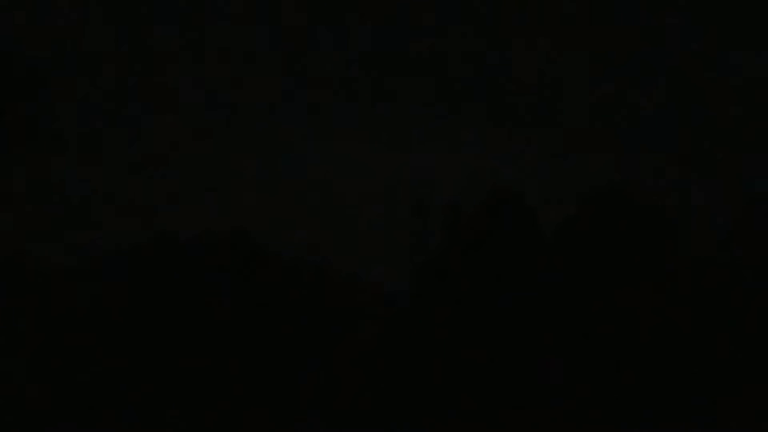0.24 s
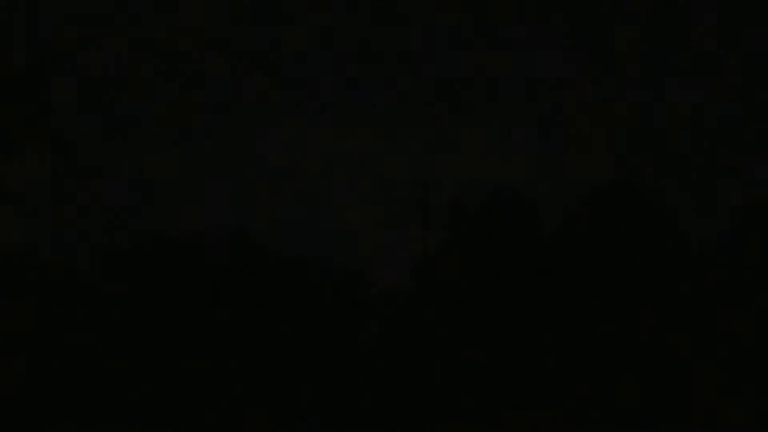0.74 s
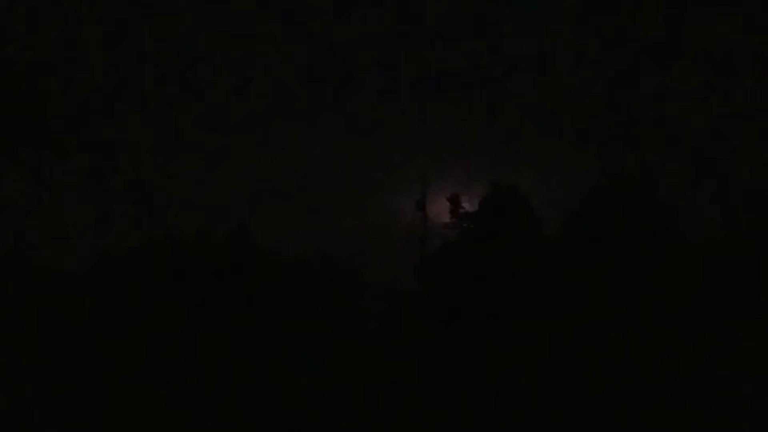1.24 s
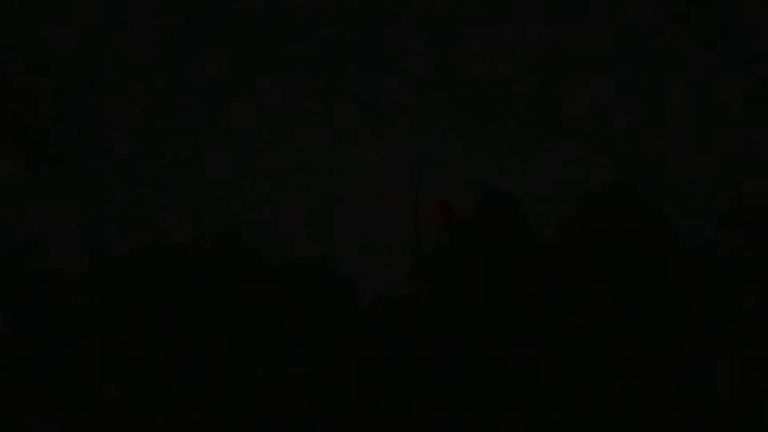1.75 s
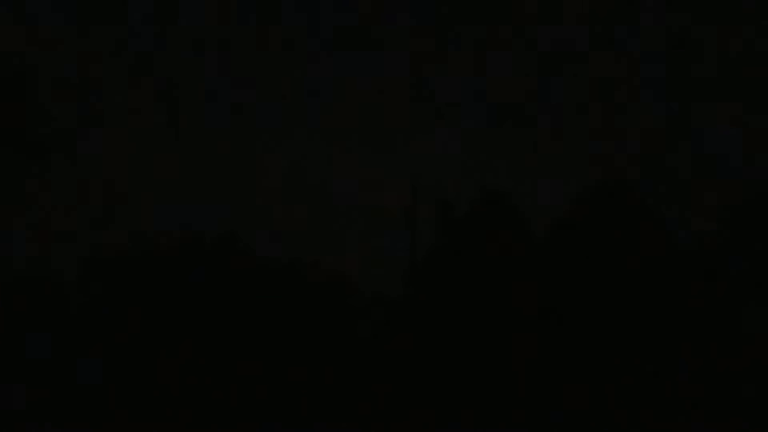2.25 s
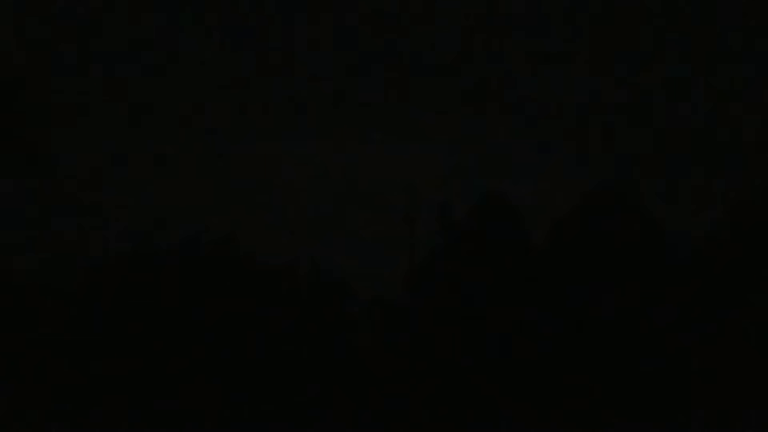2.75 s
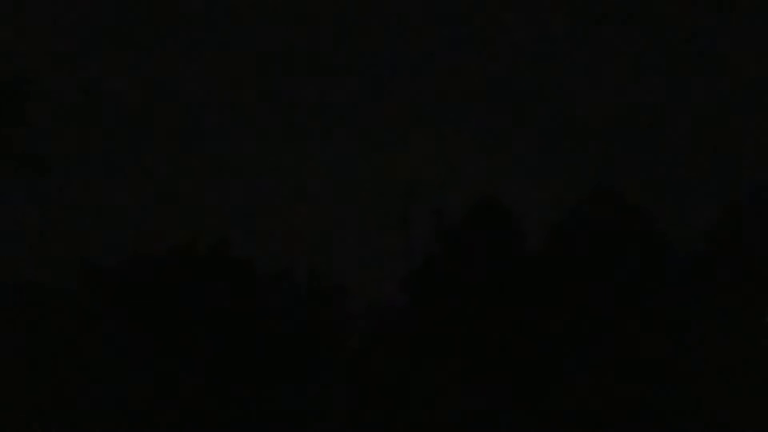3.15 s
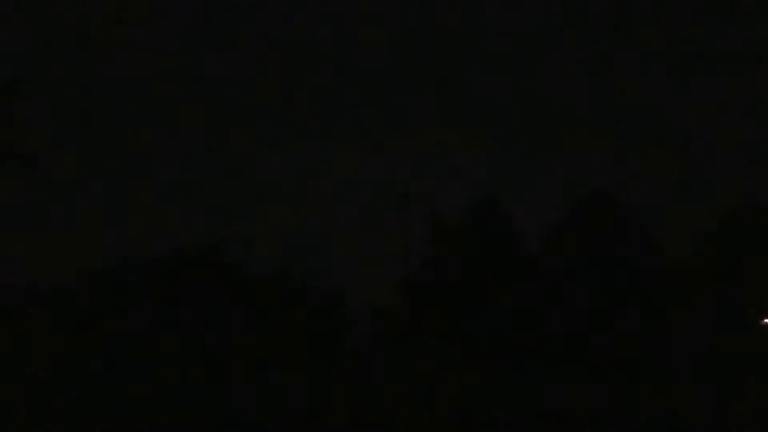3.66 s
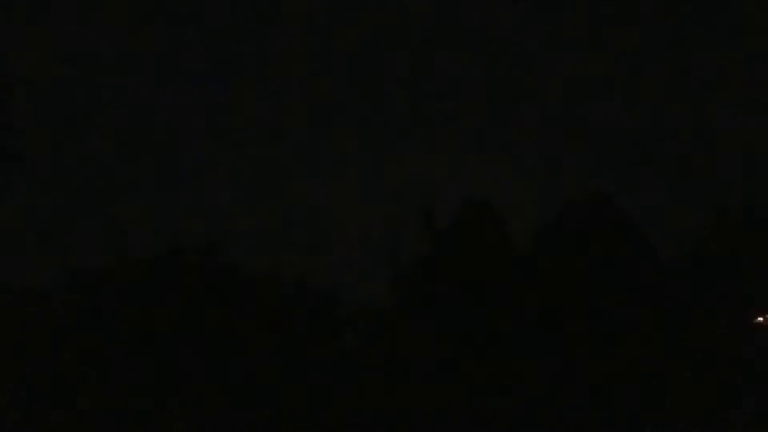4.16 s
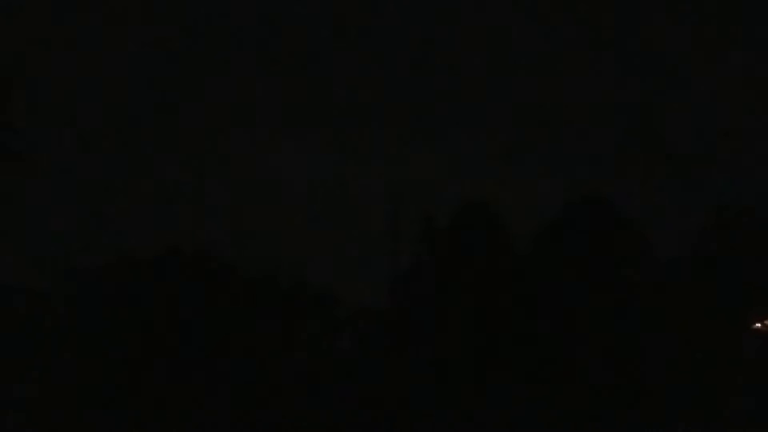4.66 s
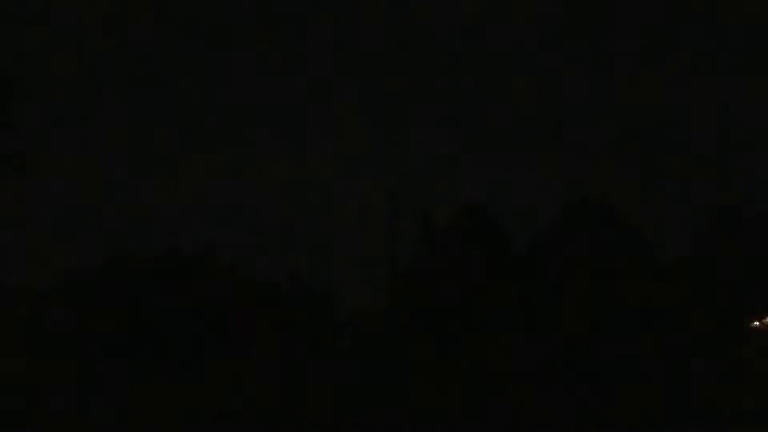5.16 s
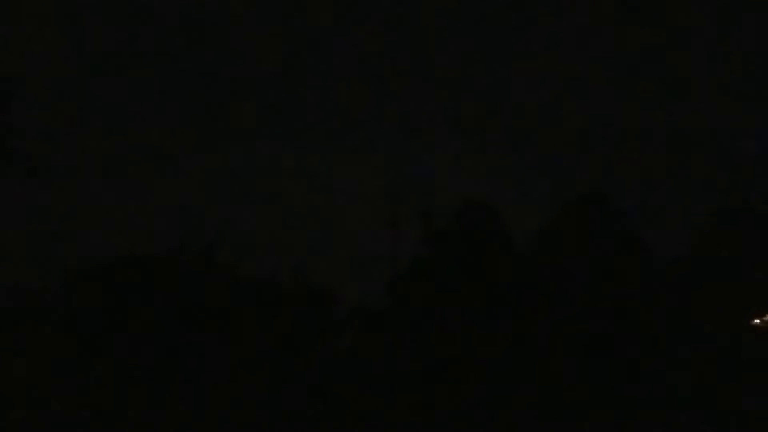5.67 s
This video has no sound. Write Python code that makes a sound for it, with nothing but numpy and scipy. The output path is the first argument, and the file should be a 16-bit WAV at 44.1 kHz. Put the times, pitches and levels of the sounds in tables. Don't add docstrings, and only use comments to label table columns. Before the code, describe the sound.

Outdoors at night by dark trees, many katydids scrape together in harsh, noisy pulses about twice a second over a steady fainter chorus. Three crickets on the left chirp in quick high trains. Distant machinery hums low throughout. Near the end one sharp dry snap clicks close to the left. Wide stereo pickup, with the insects leaning left.

```python
import sys
import numpy as np
from scipy import signal
from scipy.fft import rfft, irfft, next_fast_len
from scipy.io import wavfile
from scipy.ndimage import uniform_filter1d, map_coordinates

SR = 44100
rng = np.random.default_rng(int(sys.argv[2]) if len(sys.argv) > 2 else 0)


def generate_wav(sig):
    pcm = np.round(np.clip(np.atleast_2d(sig).T, -1, 1) * 32767).astype(np.int16)
    wavfile.write(sys.argv[1], SR, pcm)


def makeup_ratio(level_db):
    decades = np.asarray(level_db, float) / 20
    return 10 ** decades


N = 261513
LAG_S = .00039


def unit(x):
    return x / np.sqrt(np.mean(x ** 2) + 1e-20)


def along(points, hz):
    f, *cols = np.transpose(points)
    return np.array([np.interp(np.log(hz + 1), np.log(f + 1), c) for c in cols])


def curves(rows):
    s, *cols = np.transpose(rows)
    return [np.interp(np.arange(N) / SR, s, c) for c in cols]


def wobble(rate, channels=1):
    knots = rng.standard_normal((channels, 400))
    return np.array([map_coordinates(k, [np.arange(N) * rate / SR]) for k in knots])


def filtered(x, response):
    m = next_fast_len(N + SR // 2)
    return irfft(rfft(x, m) * response(np.fft.rfftfreq(m, 1 / SR)), m)[..., :N]


def closed(points, hz):
    return makeup_ratio(along(points, hz)) * ((hz > points[0][0]) & (hz < points[-1][0]))


# (frequency [Hz], left level [dB], right level [dB])
RUMBLE_COLOUR = [(15, -112.0, -110.7), (35, -88.5, -84), (58.4, -82, -81.5), (87, -76, -74),
                 (110, -76.5, -74.5), (151.4, -78.5, -76.5), (185, -89, -87), (245, -84.5, -83),
                 (310, -89, -87.5), (410, -89.5, -89), (598, -95.5, -94.5), (895, -96, -96.5),
                 (1320, -97.5, -95.5), (1610, -122.3, -122.4)]
# (frequency [Hz], likeness [0-1])
RUMBLE_ALIKE = [(30, .93), (80, .98), (150, .96), (300, .84), (550, .4), (900, .55), (1400, .5)]


def rumble():
    turn = lambda hz: np.arccos(np.clip(along(RUMBLE_ALIKE, hz)[0], 0, 1)) / 2
    mid_side = lambda hz: np.array([np.cos(turn(hz)), np.sin(turn(hz))])
    mid, side = filtered(rng.standard_normal((2, N)), mid_side)
    return unit(filtered(np.array([mid + side, mid - side]), lambda hz: closed(RUMBLE_COLOUR, hz)))


# (frequency [Hz], level [dB])
MOTOR_TONES = [(59, -71), (81, -66), (118.4, -66.5), (238, -77)]


def motors():
    t = np.arange(N) / SR
    tones = 0
    for hz, db in MOTOR_TONES:
        level = makeup_ratio(db + 4.6 * wobble(2.41))
        tones = tones + level * np.sin(2 * np.pi * hz * t + 1.27 * wobble(3.1))
    return tones * makeup_ratio([[-1.1], [.9]])


# (time [s], level [dB])
RUMBLE_LEVEL = [
    (0.0, -54),
    (1.27, -54.5),
    (2.43, -55.5),
    (2.73, -55),
    (4.24, -55.5),
    (4.59, -55.5),
    (5.05, -56),
    (5.38, -55),
    (5.93, -56),
]


def hum():
    level = makeup_ratio(curves(RUMBLE_LEVEL)[0] + 0.5 + 0.92 * wobble(7))
    both = level * rumble() + motors()
    return filtered(both, lambda hz: np.exp(-2j * np.pi * hz * np.array([[0], [LAG_S]])))


def strikes(spread_db, alike):
    sizes = makeup_ratio(spread_db * rng.standard_normal((3, N)))
    common, left, right = rng.standard_normal((3, N)) * sizes
    shared = np.array([common, np.roll(common, round(LAG_S * SR))])
    return unit(np.sqrt(alike) * shared + np.sqrt(1 - alike) * np.array([left, right]))


# (frequency [Hz], left level [dB], right level [dB])
BODY_COLOUR = [(920, -111.7, -116.0), (1399, -92, -96), (1820, -82, -88), (2135, -71.5, -75.5),
               (2430, -75, -86.5), (2610, -78.5, -84), (2706, -76, -76.5), (2953, -76.5, -75),
               (2993, -72, -87), (3330, -76.5, -77), (3685, -77, -83.5), (3680, -74, -81),
               (3760, -78, -89.5), (4600, -105.4, -107.9)]
WING_COLOUR = [(3350, -105.3, -107.5), (4200, -93.5, -77), (4300, -76, -88.5), (4790, -78.5, -77),
               (5280, -77.5, -81), (5440, -83.5, -81), (5740, -84, -85.5), (6280, -84, -102),
               (6830, -92.5, -90.5), (6730, -95, -102.3), (7400, -95, -106.0), (8580, -105.8, -108.0),
               (9720, -111.1, -109.8), (10900, -136.1, -134.8)]
RASP_COLOUR = [(9100, -132.7, -132.0), (10020, -107.7, -107.0), (10670, -101.1, -101.1), (11940, -90, -94),
               (12700, -95, -88.5), (13200, -85, -95), (13800, -85.5, -95), (15750, -82, -83.5),
               (15340, -83, -88), (16700, -110.9, -115.3)]
# (frequency [Hz], level [dB])
DISTANCE = [(1500, 3), (2100, -3), (2780, 2), (3100, -7), (3500, 1), (4300, -7), (5200, -4), (6000, -15),
            (6600, 3), (7500, -3.5), (9700, 4), (10500, -5.5), (12000, -11.5), (15600, -39)]


def far_chorus():
    zones = (BODY_COLOUR, WING_COLOUR, RASP_COLOUR)
    whole = lambda hz: np.sqrt(sum(closed(colour, hz) ** 2 for colour in zones))
    far = filtered(strikes(spread_db=1.0, alike=.25), lambda hz: whole(hz) * makeup_ratio(along(DISTANCE, hz)))
    return makeup_ratio(-48) * unit(far)


def cricket(chirps, count, rate_hz, top_hz, fall_hz, duty, gain_db, right_db, lag_ms):
    voice = np.zeros(N + 2 * SR)
    closure = duty * SR / rate_hz
    u = np.arange(int(closure)) / closure
    chance = rng.standard_normal((len(chirps), count, 3))
    for (s, db), row in zip(chirps, chance):
        for k, (size, tune, phase) in enumerate(row):
            hz = top_hz - fall_hz * u * u + 40 * tune
            level = makeup_ratio(db + gain_db + 0.78 * size - 3.2 * np.exp(-1.5 * k))
            start = SR + round((s + (k + .5 - duty / 2) / rate_hz) * SR)
            tone = np.sin(2 * np.pi * np.cumsum(hz) / SR + 7 * phase)
            voice[start:start + len(u)] += level * np.sqrt(np.sin(np.pi * u)) * tone
    late = SR - round(lag_ms * SR / 1000)
    return np.array([voice[SR:SR + N], makeup_ratio(right_db) * voice[late:late + N]])


# (first chirp [s], gap [s], level [dB])
HIGH_RUNS = [
    (.045, .1727, -65.7),
    (.752, .1802, -66),
    (2.57, .19, -67),
    (3.322, .182, -65.5),
    (4.575, .157, -64.7),
    (5.068, .1765, -65.4),
]
RUN_CHIRPS = (4, 10, 4, 7, 3, 5)
# (time [s], level [dB])
MID_CHIRPS = [(-0.016, -61), (0.219, -67), (0.443, -63), (0.701, -62), (0.971, -65), (1.241, -63),
              (1.49, -65), (1.76, -63), (2.0, -62), (2.226, -62), (2.457, -63), (2.718, -65), (2.963, -64),
              (3.201, -62), (3.469, -63), (3.703, -71), (3.951, -63), (4.201, -64), (4.442, -65),
              (4.709, -69), (4.982, -66), (5.241, -68), (5.49, -62), (5.73, -66)]
LOW_CHIRPS = [(-0.012, -68), (0.253, -68), (0.563, -67.0), (0.827, -69), (1.122, -65.4), (1.388, -64.3),
              (1.676, -67.2), (1.964, -67), (2.256, -65), (2.546, -67), (2.838, -66.5), (3.143, -66),
              (3.42, -65), (3.706, -70), (3.967, -65), (4.257, -66), (4.533, -70), (4.839, -68),
              (5.117, -66.5), (5.413, -68), (5.667, -67)]


def crickets():
    high = [(s + k * gap, db) for (s, gap, db), count in zip(HIGH_RUNS, RUN_CHIRPS) for k in range(count)]
    direct = cricket(high, count=6, rate_hz=107, top_hz=9145, fall_hz=870, duty=.92,
                     gain_db=6.5, right_db=-31, lag_ms=.3)
    direct = direct + cricket(MID_CHIRPS, count=10, rate_hz=86.1, top_hz=8580, fall_hz=500, duty=.6,
                              gain_db=4, right_db=-12, lag_ms=.4)
    direct = direct + cricket(LOW_CHIRPS, count=8, rate_hz=57, top_hz=6934, fall_hz=70, duty=.9,
                              gain_db=7.5, right_db=-16, lag_ms=.3)
    t = np.arange(SR // 8) / SR
    leaves = rng.standard_normal((2, len(t))) * makeup_ratio(-60 * t / .05)
    leaves = leaves / np.linalg.norm(leaves[0])
    return direct + makeup_ratio(-11) * signal.fftconvolve(direct, leaves, axes=1)[:, :N]


# (time [s], peak level [dB], frequency [Hz])
SNAP = [
    (5.32, -28, 3000),
]


def snap():
    out, t = np.zeros((2, N)), np.arange(44) / SR
    for s, db, hz in SNAP:
        pulse = -np.hanning(len(t)) * np.cos(2 * np.pi * hz * (t - t.mean()))
        out[:, round(s * SR):][:, :len(t)] += makeup_ratio([[db], [db - 20]]) * pulse
    return out


def phrases(rows, attack_s, release_s, growth_db):
    t = np.arange(0, N, 32) / SR
    gate = lambda v: .5 + .5 * np.tanh(v / 2)
    power = 0
    for s, length, db in rows:
        swell = makeup_ratio(2 * (db + growth_db * np.clip(t - s, 0, length)))
        power = power + swell * gate((t - s) / attack_s) * gate((s + length - t) / release_s)
    return np.interp(np.arange(N) / SR, t, power)


# (start [s], length [s], level [dB])
LEADER = [(0.052, 0.39, -2.5), (0.615, 0.37, -2), (1.237, 0.34, -1.2), (1.85, 0.33, 0.5),
          (2.432, 0.34, -0.5), (2.952, 0.318, -0.1), (3.494, 0.32, -0.5), (4.021, 0.38, -6),
          (4.654, 0.25, 1.8), (5.183, 0.3, 0.9), (5.718, 0.331, 4)]
ANSWER = [(0.194, 0.26, 3.5), (0.798, 0.28, 2.2), (1.337, 0.33, 0.2), (1.933, 0.39, -1),
          (2.573, 0.22, -2.5), (3.04, 0.28, -2), (3.495, 0.39, -1.2), (4.046, 0.441, 1), (4.657, 0.41, 1.5),
          (5.207, 0.5, -3), (5.74, 0.348, -2)]
GROUP = [(-0.185, 0.21, 2.5), (0.346, 0.275, 0.8), (0.922, 0.31, -0.5), (1.483, 0.33, 1.3),
         (1.985, 0.4, -0.5), (2.557, 0.44, 1.4), (3.173, 0.29, -1.2), (3.684, 0.32, 1.0),
         (4.246, 0.49, 0.9), (4.823, 0.54, -3.5), (5.338, 0.3, 1)]
# (last stroke [s], level [dB])
STROKER = [
    (.435, 2),
    (.99, -5),
    (1.515, -2),
    (2.155, 3),
    (2.765, 1.5),
    (3.24, -5),
    (3.755, 2.5),
    (4.36, -1),
    (5.045, 1),
    (5.63, -0.5),
]
# (attack [s], release [s], growth [dB/s])
SHAPES = [
    (0.006, .02, 23),
    (0.01, .0167, -6),
    (0.061, 0.0079, -35),
    (0.0037, 0.0036, -2),
]


def efforts():
    stroke_s, gap_s = 0.028, 0.084
    strokes = [(s - k * gap_s, stroke_s, db) for s, db in STROKER for k in range(3)]
    callers = (LEADER, ANSWER, GROUP, strokes)
    return np.array([phrases(rows, *shape) for rows, shape in zip(callers, SHAPES)])


def coloured(x, colour):
    return np.array([unit(ear) for ear in filtered(x, lambda hz: closed(colour, hz))])


# (body level [dB], wing level [dB], rasp level [dB])
AT_LEFT = [
    (-49.5, -56.4, -59),
    (-47, -50.5, -58.5),
    (-41.5, -46.4, -57.5),
    (-57, -51, -66),
]
AT_RIGHT = [
    (-56, -57.9, -66.5),
    (-49.4, -50.5, -57.5),
    (-45, -48, -59),
    (-56, -50.5, -60),
]


def katydids():
    caller_power = makeup_ratio(2 * np.transpose([AT_LEFT, AT_RIGHT], (2, 0, 1)))
    body_gain, wing_gain, rasp_gain = np.sqrt(caller_power @ efforts())
    near = strikes(spread_db=3.0, alike=0.31)
    near = near + 0.12 * np.roll(near, round(.00396 * SR), axis=1)
    beat = np.sin(2 * np.pi * 10.8 * np.arange(N) / SR + 1.77 * wobble(4.5, channels=2))
    syllable_db = 2.33 * beat + 0.59 * wobble(23.81)
    body = body_gain * makeup_ratio(0.44 * syllable_db) * coloured(near, BODY_COLOUR)
    wing = wing_gain * makeup_ratio(0.5 * syllable_db) * coloured(near, WING_COLOUR)
    rasp = rasp_gain * makeup_ratio(0.8 * beat) * coloured(strikes(spread_db=2.5, alike=.02), RASP_COLOUR)
    return body + wing + rasp


def scene():
    return hum() + far_chorus() + crickets() + snap() + katydids()


def masked(x, under_db, from_hz, to_hz):
    hz, _, z = signal.stft(x, SR, nperseg=1024)
    power = np.abs(z) ** 2
    fickle_db = 8.5 * uniform_filter1d(rng.standard_normal(z.shape), size=4, axis=1)
    around = uniform_filter1d(power, size=45, axis=1)
    weak = uniform_filter1d(power, size=4, axis=1) < makeup_ratio(fickle_db - 2 * under_db) * around
    treble = (hz[:, None] > from_hz) & (hz[:, None] < to_hz)
    return signal.istft(z * ~(weak & treble), SR, nperseg=1024)[1][:, :N]


def low_pass(x):
    return signal.sosfilt(signal.butter(12, 15830, fs=SR, output="sos"), x)


def record(dry):
    kept = masked(dry, under_db=4.2, from_hz=7050, to_hz=11000)
    mix = filtered(kept, lambda hz: hz < 15845) - .0006
    return low_pass(mix)


dry = scene()
out = record(dry)
generate_wav(out)
```